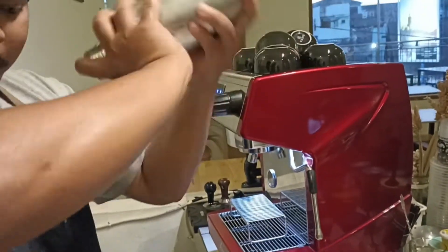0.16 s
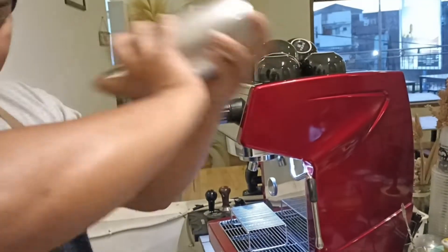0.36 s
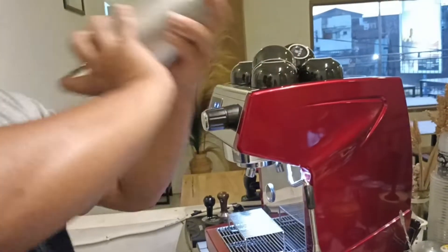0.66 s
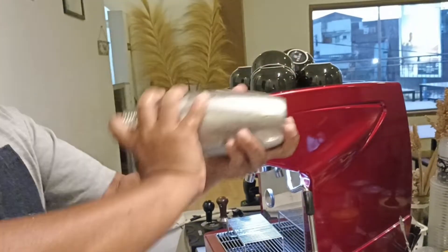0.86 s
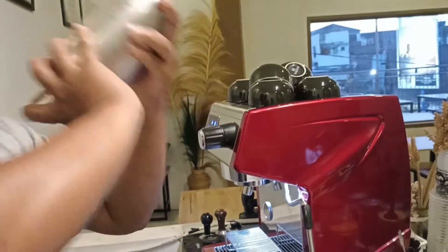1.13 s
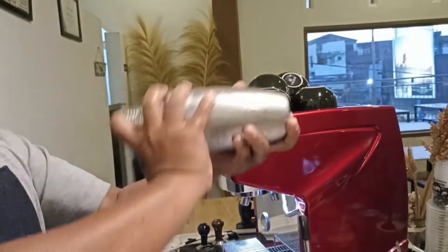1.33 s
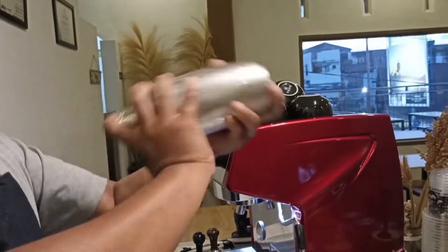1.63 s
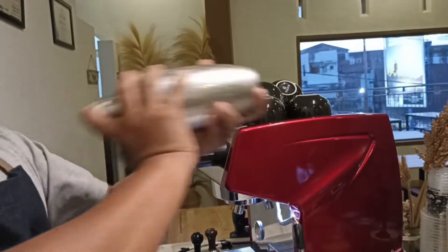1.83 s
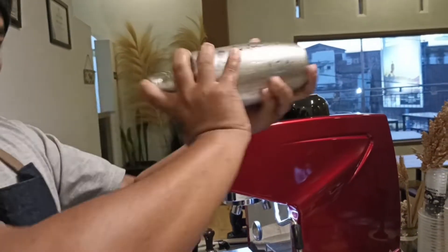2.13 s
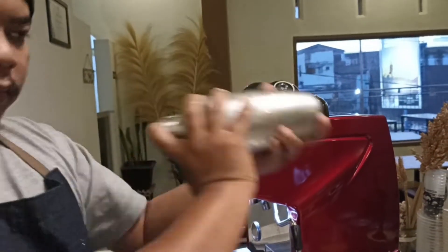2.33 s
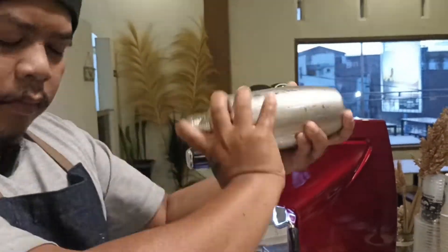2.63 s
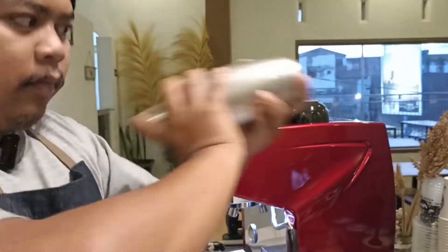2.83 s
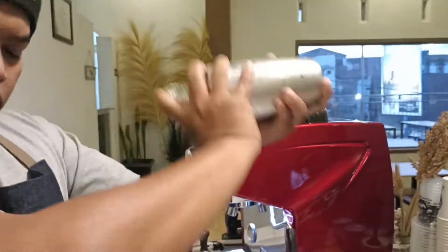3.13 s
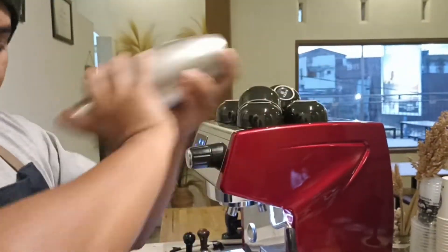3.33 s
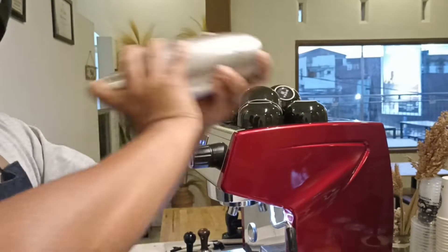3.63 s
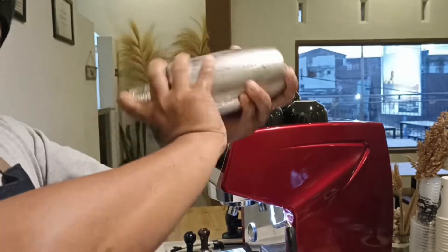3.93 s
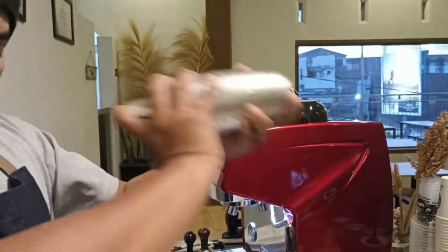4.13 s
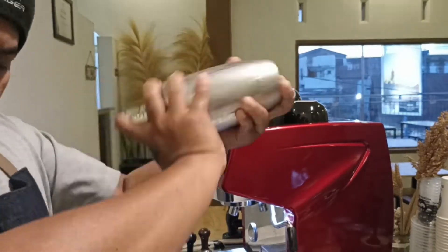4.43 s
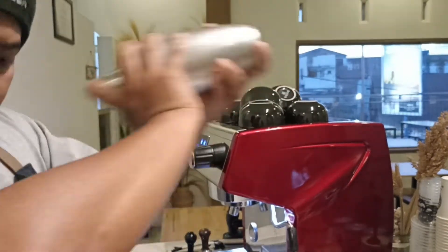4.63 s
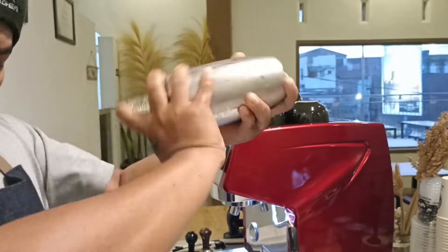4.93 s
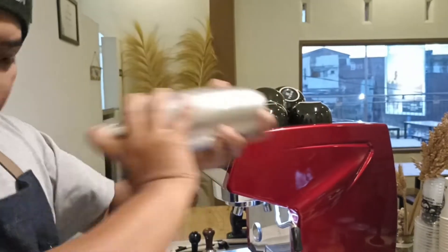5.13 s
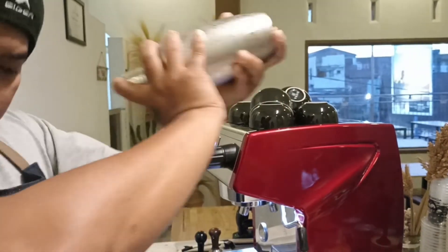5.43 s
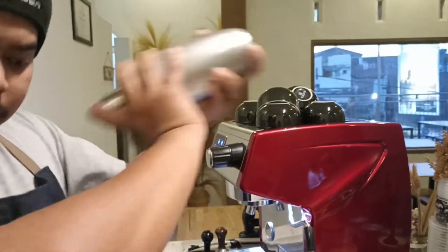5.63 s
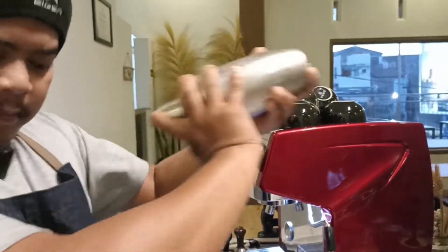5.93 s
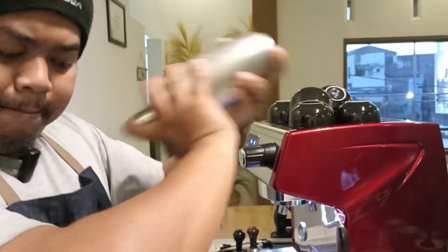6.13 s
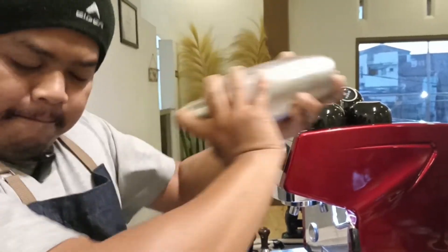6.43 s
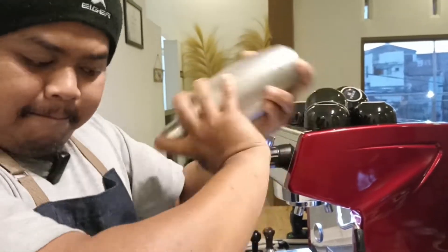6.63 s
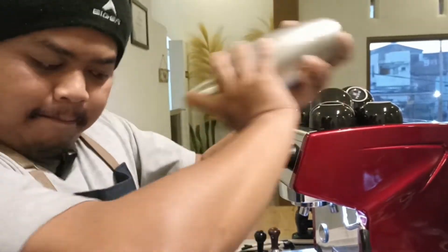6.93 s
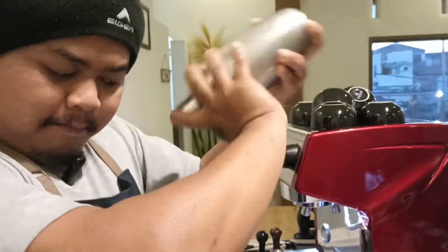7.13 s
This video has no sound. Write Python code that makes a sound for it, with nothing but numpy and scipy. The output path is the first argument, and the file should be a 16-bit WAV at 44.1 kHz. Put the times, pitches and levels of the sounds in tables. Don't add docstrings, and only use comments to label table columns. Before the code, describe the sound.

Ice and liquid slam back and forth inside a metal shaker shaken fast and hard, bright rattling bursts very close in a quiet cafe.

```python
import sys
import numpy as np
from scipy import signal
from scipy.fft import rfft, irfft, next_fast_len
from scipy.io import wavfile

SR = 44100
rng = np.random.default_rng(int(sys.argv[2]) if len(sys.argv) > 2 else 0)


def amp(db):
    return 10 ** (np.asarray(db, float) / 20)


def write(x):
    x = np.atleast_2d(x).T
    wavfile.write(sys.argv[1], SR, np.round(np.clip(x, -1, 1) * 32767).astype(np.int16))


N = 320607

# t/s, rim level/dB, cap level/dB, return delay/ms, return rim level/dB
HARD_SHAKES = [(1.311, -18.5, -16, 57.4, -19.5), (1.449, -20, -14.5, 82.4, -26.5),
               (1.619, -15, -13.5, 72, -24.5), (1.772, -13, -18, 71.4, -16.5),
               (1.926, -11.5, -15, 70.4, -19.5), (2.083, -9, -20, 85.6, -17.5),
               (2.248, -11, -14.5, 67.6, -21.5), (2.409, -9, -12, 86, -19), (2.581, -12, -12.5, 74, -20),
               (2.742, -11, -16, 82, -24), (2.907, -18.5, -14, 83.3, -20), (3.078, -12, -9.5, 60.5, -24.5),
               (3.241, -15, -10.5, 73, -18.5)]
EASING_SHAKES = [(3.41, -26, -12, 66.5, -27.5), (3.565, -24, -15, 75.6, -27), (3.723, -21, -15, 74, -31),
                 (3.881, -23, -21, 67.8, -27.5), (4.051, -21, -17.5, 64, -29.5),
                 (4.218, -23.5, -21, 84.3, -26.5), (4.39, -23, -16.5, 68.6, -31),
                 (4.557, -18.5, -19.5, 89, -33.5), (4.721, -22, -13.5, 58.3, -28.5),
                 (4.881, -22, -14.5, 82, -30.5), (5.058, -17, -18.5, 67, -27),
                 (5.225, -23.5, -18, 69, -27.5), (5.383, -21, -17, 66, -27.5),
                 (5.536, -22, -20, 66.5, -25.5), (5.699, -24, -22.5, 75.6, -27.5),
                 (5.87, -21.5, -21.5, 71, -29), (6.03, -22.5, -27.5, 76.5, -27), (6.198, -18, -18, 71, -29),
                 (6.369, -15, -23, 55, -26), (6.519, -22, -30, 76, -31), (6.695, -20, -22.5, 65, -33),
                 (6.837, -23.5, -34, 82.5, -31.5), (7.009, -21, -18, 76, -34.5),
                 (7.18, -24, -23, 71.4, -28)]


def throws():
    # t/s, rim level/dB, cap level/dB, return delay/ms, return rim level/dB
    opening_shakes = [
        (-.075, 5, -28, 62, -18),
        (0.058, -16, -20, 77, -18.5),
        (.211, -16.5, -19, 74, -19.5),
        (0.362, -12, -19, 76.5, -17.5),
        (.523, -14.5, -16.5, 82, -21.5),
        (.678, -13.5, -14, 74, -18.5),
        (.825, -14, -11, 79.5, -20.5),
        (.99, -15.5, -24, 76.4, -19.5),
        (1.139, -27, -30.5, 93, -42.5),
    ]
    # wall level/dB, cavity level/dB, thud level/dB, length/ms, air level/dB
    usual_out = [(-22.5, -26, -30, 15.4, -69), (-33.5, -40.5, -40, 14.6, -56),
                 (-29.5, -36, -39.5, 16.75, -52)]
    usual_back = [(-25, -29.5, -30, 15.7, -65.5), (-27.5, -40, -36, 15.5, -66.5),
                  (-34, -42.5, -39.5, 20.3, -59)]
    # out f/Hz, back f/Hz
    part_wall_hz = [(6100, 6700), (3900, 5170), (4400, 5060)]
    part_thud_hz = [1486, 787, 778]
    # level over rim/dB, share following its strength/1
    return_cap = [(-1.5, 1), (-9, 0.52), (-6.5, 0.55)]
    return_rim_pitch = [.96, .87, .93]
    return_cap_pitch = [1, .93, .85]
    # t/s, wall freed/dB, cavity freed/dB, stray modes/dB, arms level/dB
    hand_moves = [(0, 3.5, -0.5, 7, -5), (.3, 0.5, -1, 10, 3), (.55, 4, 5, -3.5, -7), (.7, 0, 3, -11.5, 0),
                  (1.0, -8, 5.5, -6, 11), (1.22, -3.5, -3.5, -10, 0), (1.3, 4.5, 16, 0, -3),
                  (1.9, 1.5, 8.5, -9, -4), (2.25, 2.5, -7, -2.5, 2), (3.0, 2.5, 2, -5, 3),
                  (3.4, 0.5, -0.5, -1.5, 2), (4.55, 5.5, 0, -1.5, 2), (5, 0, -0.5, -1, -2),
                  (7.27, 0.5, -2, 0.5, -5.5)]
    # t/s, wall level/dB, cavity level/dB, thud level/dB, wall f/Hz
    odd_landings = [(.825, 9, 0.5, -5, 6100), (1.218, 0.5, 8, 2, 6400), (1.844, 5.5, -3, 2, 5300),
                    (2.177, -1, 9.5, 6, 4940), (2.248, 7, 2, -3, 3500), (2.496, 1.5, 12.5, -2, 5400),
                    (3.079, -2.5, 8.5, 6, 3860), (3.243, 10, 5, 2.5, 6240), (3.411, 6.5, 9, 2, 4900),
                    (3.566, -5, 4, 8.5, 3500), (3.723, 2, 12.5, 4, 3060), (3.945, 6, -3, 5, 4700),
                    (4.219, -2, -0.5, -0.5, 6700), (4.31, 2, 0, -0.5, 4530), (4.392, 2, 7, -2, 3830),
                    (5.126, 2.5, -7, 4, 4570), (2.989, -1, -2, -1.5, 4960), (4.883, 5.5, 4, 3.5, 4250),
                    (1.995, 1, 2.5, -1, 4800), (.363, 1.5, 3.5, 3.5, 5360), (5.537, 5.5, -3, 0.5, 4370),
                    (5.697, 2, 12, 1.5, 4450), (6.029, 7, 4.5, 9.5, 3750), (6.421, 2.5, 3, 5, 3640)]

    parts = [opening_shakes, HARD_SHAKES, EASING_SHAKES]
    part = np.repeat(np.arange(3), [len(p) for p in parts])
    start, rim, cap, after_ms, back = np.transpose(np.concatenate(parts))
    s = np.r_[start, start + after_ms / 1000]
    over = back - (np.bincount(part, back) / np.bincount(part))[part]
    under_db, share = np.transpose(return_cap)[:, part]
    back_cap = back - (1 - share) * over + under_db
    wall, cavity, thud, length_ms, air = np.r_[np.array(usual_out)[part], np.array(usual_back)[part]].T

    knots, *controls = np.transpose(hand_moves)
    freed, open_db, stray_db, arms_db = [np.interp(s, knots, c) for c in controls]
    extra = np.tile(np.r_[0 * over, 0.61 * over], (3, 1))
    wall_hz = np.transpose(part_wall_hz)[:, part].ravel().astype(float)
    usual = np.ones(len(s))
    for when, *db, hz in odd_landings:
        k = np.argmin(abs(s - when))
        extra[:, k] += db
        wall_hz[k], usual[k] = hz, 0

    out_pitch = np.ones(len(part))
    return dict(
        s=s, length=length_ms / 1000, usual=usual, stray=stray_db, air=air + arms_db,
        rim=np.r_[rim, back], cap=np.r_[cap, back_cap],
        wall=wall + freed + extra[0],
        cavity=cavity + open_db + extra[1],
        thud=thud + 0.34 * freed + extra[2],
        wall_hz=wall_hz, thud_hz=np.tile(np.array(part_thud_hz)[part], 2),
        rim_pitch=np.r_[out_pitch, np.array(return_rim_pitch)[part]],
        cap_pitch=np.r_[out_pitch, np.array(return_cap_pitch)[part]])


def cubes():
    # t/s, peak level/dB, low knock level/dB
    stray_cubes = [(0.048, 4.5, -55), (0.1233, -18, -38), (0.5102, -20, -34), (0.585, -0.5, -12.5),
                   (0.6679, -17, -45), (0.7505, -4, -40), (0.8095, -6, -40), (2.7117, -22, -38),
                   (0.992, -8, -19), (1.059, 0, -39), (1.1278, -10.5, -16), (1.292, -3, -29),
                   (1.4404, 2.5, -31), (1.7704, -22, -54), (2.17, -26, -16), (2.3936, -4, -24),
                   (2.5656, -23, -37), (2.815, -10, -18), (2.9696, -2.5, -27), (3.292, 4.5, -34),
                   (3.4253, 3.5, -37), (3.5716, -4, -14), (3.925, -1, -37), (4.2097, 0, -33),
                   (4.8525, 0, -35), (5.3866, -7, -23), (4.7185, -9, -44), (6.007, -9, -19),
                   (6.2006, -19, -28), (6.6436, -4, -31)]
    lead_s, lead_db, lead_knock_db = .032, -7.5, -27
    settled = [row[0] for row in [*HARD_SHAKES[4:], *EASING_SHAKES]]
    return np.array([*stray_cubes] + [(s - lead_s, lead_db, lead_knock_db) for s in settled])


def shower(rate, spread_db):
    hit = rng.random(N) < rate / SR
    return hit * amp(spread_db * np.minimum(rng.exponential(size=N), 2.8))


def chatter(sizes, t60):
    t = np.arange(400) / SR
    burst_power = (1 - np.exp(-t / 0.00059)) * amp(-120 * t / t60)
    return np.sqrt(np.abs(signal.fftconvolve(sizes ** 2, burst_power)[:N]))


def swell(power, rise=0.66, fall=1.377):
    throw = throws()
    coarse = np.arange(0, N / SR + .01, .001)
    late = (coarse[:, None] - throw['s']) / throw['length']
    bells = np.exp(-.5 * (late / np.where(late < 0, rise, fall)) ** 2)
    return np.interp(np.arange(N) / SR, coarse, np.sqrt(np.abs(bells @ power)))


def unit(x):
    return x / np.sqrt(np.mean(x ** 2) + 1e-20)


def along(points, hz):
    f, v = np.transpose(points)
    return np.interp(np.log(hz + 1), np.log(f + 1), v)


def filtered(x, response):
    size = next_fast_len(N + SR // 2)
    gain = response(np.fft.rfftfreq(size, 1 / SR))
    gain = gain / np.sqrt(np.mean(np.abs(gain) ** 2))
    return irfft(rfft(x, size) * gain, size)[:N]


def mode(f, hz, width_hz):
    return 1j * f * width_hz / (hz * hz - f * f + 1j * f * width_hz)


def family(sizes, level_db, cube_db, modes, centre_hz, spread, others_db, slosh, t60, fall=1.33):
    blows = np.zeros(N)
    blows[np.round(cubes()[:, 0] * SR).astype(int)] = amp(cube_db)
    power = amp(2 * level_db)
    crack = chatter(blows, 4.0 * t60) / (swell(power, fall=fall) + 1e-6)

    away = np.array([(np.log(hz / centre_hz) / spread) ** 2 for hz, _ in modes])
    chance = amp(2 * (others_db + 3.88 * rng.standard_normal(away.shape[::-1]).T))
    aimed = np.exp(-away)
    strayed = chance / (1 + 0.014 * away)
    both = np.sum(aimed + strayed, axis=0)

    family_sizes = sizes * amp(4.74 * np.clip(rng.standard_normal(N), -3, 2.2))
    total = np.zeros(N)
    for near, far, (hz, width) in zip(aimed / both, strayed / both, modes):
        own = family_sizes * amp(5.2 * np.clip(rng.standard_normal(N), -3, 1.6))
        grain = unit(np.hypot(unit(chatter(own, t60)), slosh))
        impact = swell(0.81 * power * near, rise=0.58, fall=0.64 * fall)
        wash = swell(power * far, fall=fall)
        drive = (grain + crack) * np.hypot(impact, wash) * rng.standard_normal(N)
        total += filtered(drive, lambda f: mode(f, hz, width) ** 2)
    return total


def shaker():
    # f/Hz, width/Hz
    rim_modes = [(11600, 3900), (12500, 1500), (13400, 3100), (14200, 640), (14800, 930)]
    cap_modes = [(7600, 900), (8300, 750), (8900, 750), (9450, 650), (9900, 750), (10600, 1000)]
    wall_modes = [(3500, 600), (4100, 600), (4650, 600), (5200, 600), (5900, 700), (6700, 800)]
    cavity_modes = [(2000, 260), (2170, 236), (2270, 157), (2350, 230), (2700, 1000)]
    thud_modes = [(400, 280), (540, 240), (740, 580), (1000, 680), (1350, 490), (1720, 480)]
    # t/s, rim f/Hz, cap f/Hz
    grip_moves = [(0, 13500, 8900), (.7, 13400, 8400), (1.1, 12300, 8200), (1.3, 13900, 9700),
                  (2.2, 14300, 9700), (4, 14250, 9500), (7.27, 14400, 9550)]
    contact_t60 = dict(rim=.0055, cap=.007, wall=.008, cavity=.009, thud=.005)

    throw = throws()
    s, stray = throw['s'], throw['stray']
    rim_db, cap_db, cavity_db = throw['rim'], throw['cap'], throw['cavity']
    knots, *centres = np.transpose(grip_moves)
    rim_hz, cap_hz = [np.interp(s, knots, c) * (1 + 0.0033 * rng.standard_normal(len(s))) for c in centres]
    wall_luck, thud_luck = rng.standard_normal((len(s), 2)).T
    wall_hz = throw['wall_hz'] * np.exp(0.047 * throw['usual'] * wall_luck)
    thud_hz = throw['thud_hz'] * np.exp(0.19 * np.clip(thud_luck, -1, 2))
    cavity_hz = 2260 * (1 + 0.0061 * rng.standard_normal(len(s)))
    _, peak_db, knock_db = np.transpose(cubes())
    missed_db = 0.59 * np.clip(rim_db - cap_db + 2.5, 0, 12)
    weak_cavity_db = np.clip(-35.0 - cavity_db, -14, 0)

    sizes = shower(rate=750, spread_db=3.0)
    rim = family(sizes, rim_db, peak_db - 12.5, rim_modes, rim_hz * throw['rim_pitch'], 0.029,
                 others_db=stray - 4.0, slosh=0.8, t60=contact_t60['rim'])
    cap = family(sizes, cap_db, peak_db - 15, cap_modes, cap_hz * throw['cap_pitch'], 0.039,
                 others_db=missed_db + stray - 14.5, slosh=0.38, t60=contact_t60['cap'])
    wall = family(sizes, throw['wall'], peak_db - 23.0, wall_modes, wall_hz, 0.062,
                  others_db=stray - 7, slosh=0.46, t60=contact_t60['wall'])
    cavity = family(sizes, cavity_db, peak_db + knock_db - 25, cavity_modes, cavity_hz, 0.03,
                    others_db=weak_cavity_db + 1.15 * stray - 6.5, slosh=0.9,
                    t60=contact_t60['cavity'], fall=2.27)
    thud = family(sizes, throw['thud'], peak_db + knock_db + 2.0, thud_modes, thud_hz, 0.097,
                  others_db=stray - 7.5, slosh=0.52, t60=contact_t60['thud'])
    return rim + cap + wall + cavity + thud


def taps():
    # f/Hz, width/Hz, level/dB
    knock_modes = [(615, 280, 8.5), (1290, 450, 1.5), (3170, 3600, -7)]
    # t/s, peak level/dB
    flat_hits = [(1.299, -23), (1.358, -21), (1.603, -22), (1.677, -18.5), (1.827, -26), (1.978, -24),
                 (2.148, -19), (2.238, -22.5), (2.814, -23), (3.135, -23.5), (3.482, -22), (3.567, -14),
                 (3.703, -21), (3.792, -20.5), (3.869, -23), (3.94, -23), (4.02, -23), (4.618, -24),
                 (4.769, -27), (5.021, -24), (5.096, -25), (5.186, -26), (5.438, -31), (5.519, -22.5),
                 (5.597, -23), (5.758, -20.5), (5.922, -22.5), (6.409, -23), (6.605, -25), (6.905, -22)]
    s, peak_db = np.transpose(flat_hits)
    blows = np.bincount(np.round(s * SR).astype(int), amp(peak_db + 15), N)

    def knock(f):
        return sum((-1) ** k * amp(db) * mode(f, hz, width) for k, (hz, width, db) in enumerate(knock_modes))

    return filtered(blows, knock)


def arms():
    # f/Hz, level per Hz/dB
    puff_curve = [(15, -30), (25, -1), (64, -1), (145, -7), (250, -8), (500, -76)]
    # t/s, air level over the usual/dB
    strong_swings = [(1.312, 10), (1.995, 13), (2.407, 7), (2.496, 16), (2.989, 23), (3.243, 10.5),
                     (3.313, 17), (3.945, 11), (4.053, 8), (4.559, 8), (5.385, 6), (5.871, 5), (6.029, 9),
                     (6.361, 8), (6.696, 6), (7.18, -2)]
    throw = throws()
    air_db = throw['air'] + sum(db * (abs(throw['s'] - s) < .02) for s, db in strong_swings)
    low = filtered(rng.standard_normal(N), lambda f: amp(along(puff_curve, f)))
    return swell(amp(2 * air_db), rise=0.78, fall=0.77) * unit(low)


def cafe(x):
    # f/Hz, t60/s
    decay_curve = [(300, 1), (3000, 0.85), (15000, 0.05)]
    hz, t, z = signal.stft(rng.standard_normal(SR // 2), SR, nperseg=256)
    decay = amp(-60 * t / along(decay_curve, hz)[:, None])
    tail = signal.istft(z * decay, SR, nperseg=256)[1]
    delayed = np.pad(x, (300, 0))
    return signal.fftconvolve(delayed, tail / np.linalg.norm(tail))[:N]


def room_floor():
    # f/Hz, level per Hz/dB
    hush_curve = [(15, -76), (25, -48), (1940, 0.5), (2220, 15), (2610, -3), (13600, 3.5), (16000, -42)]
    return amp(-40.5) * filtered(rng.standard_normal(N), lambda f: amp(along(hush_curve, f)))


def scene():
    near = shaker() + taps()
    return (near + amp(-21.0) * cafe(near) + arms() + room_floor())[None]


def top_cut(x):
    return signal.sosfilt(signal.butter(12, 16490, fs=SR, output="sos"), x)


def record(dry):
    limited = dry / (1 + np.abs(dry / .85) ** 4) ** (1 / 4)
    size = next_fast_len(N + SR // 2)
    f = np.fft.rfftfreq(size, 1 / SR)
    top_hz = 15480
    shoulder_db = -12 * np.clip((f - 14900) / 600, 0, 1)
    cliff_db = -22 * np.clip((f - top_hz) / 500, 0, 1) - 8 * (f > top_hz)
    narrow = irfft(rfft(limited, size) * amp(shoulder_db + cliff_db), size)[:, :N]
    return top_cut(narrow)


dry = scene()
out = record(dry)
write(out)
```